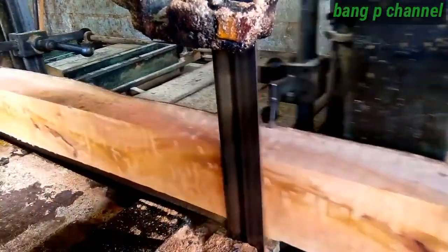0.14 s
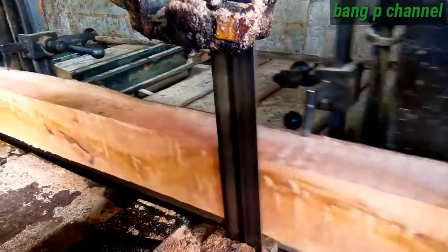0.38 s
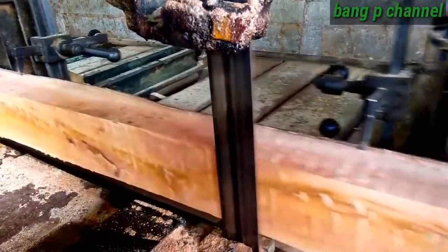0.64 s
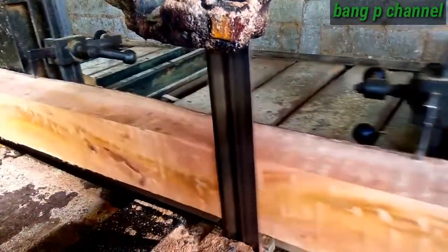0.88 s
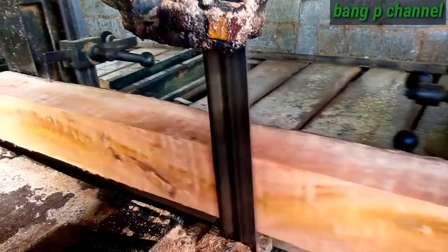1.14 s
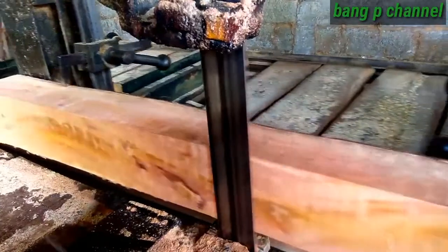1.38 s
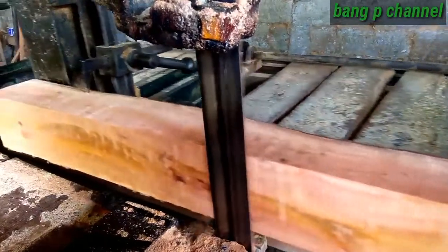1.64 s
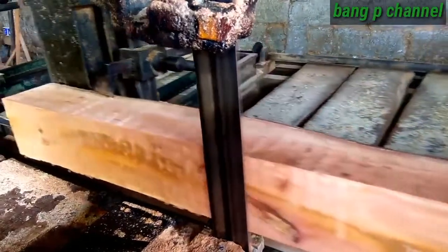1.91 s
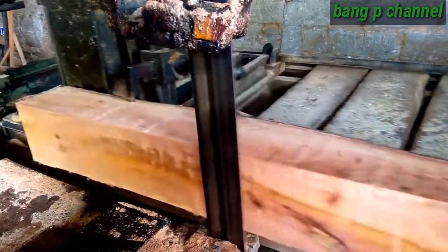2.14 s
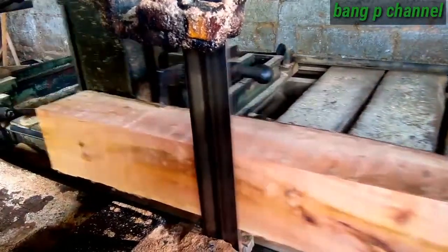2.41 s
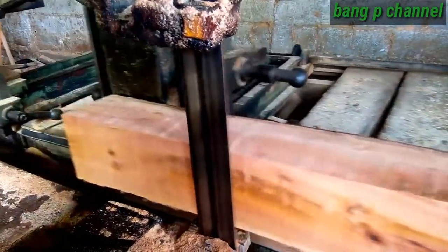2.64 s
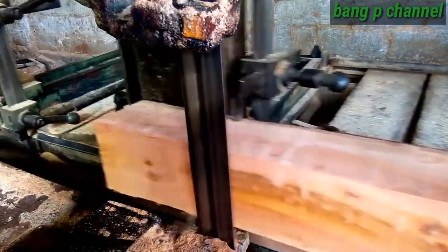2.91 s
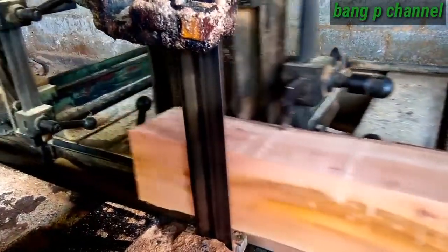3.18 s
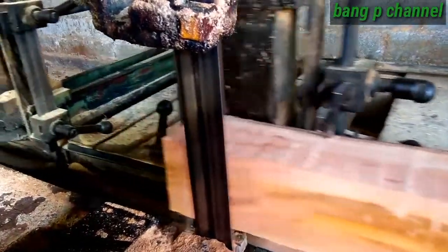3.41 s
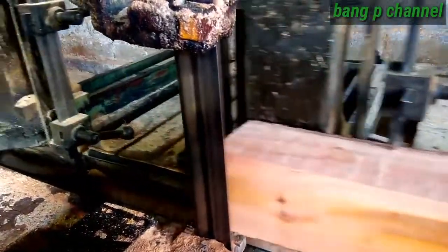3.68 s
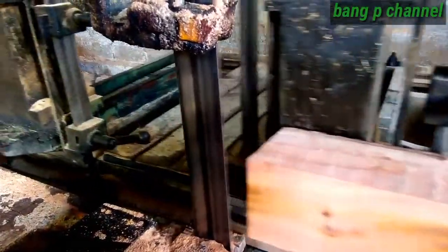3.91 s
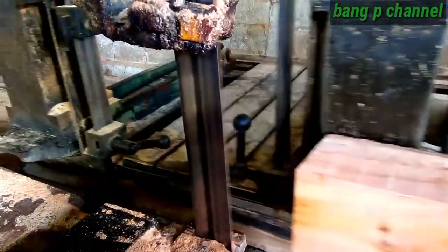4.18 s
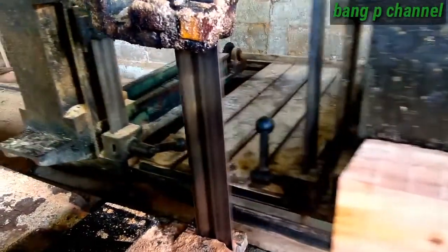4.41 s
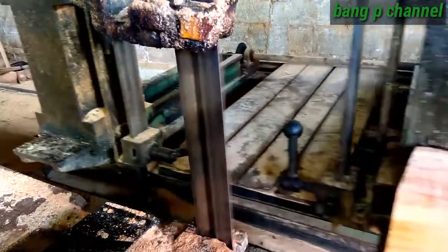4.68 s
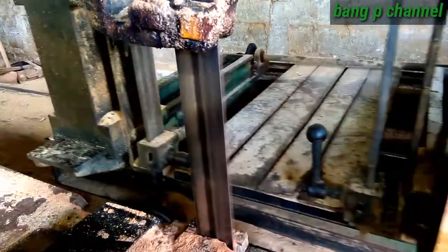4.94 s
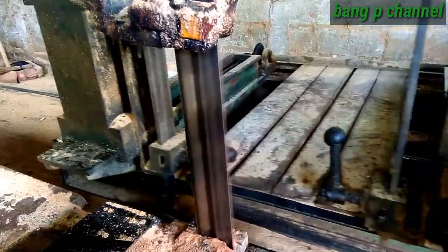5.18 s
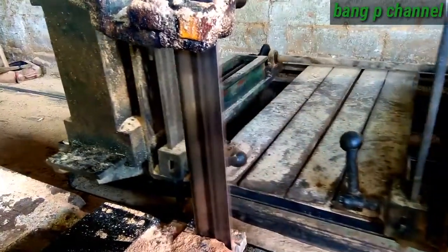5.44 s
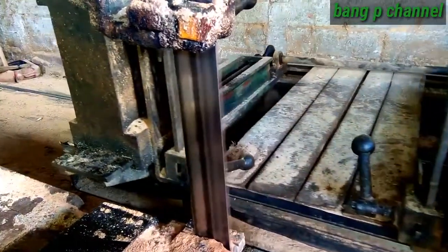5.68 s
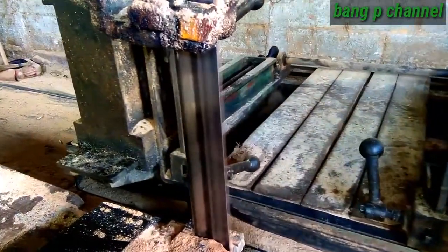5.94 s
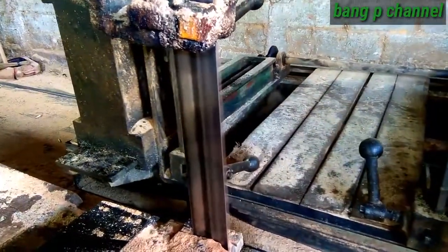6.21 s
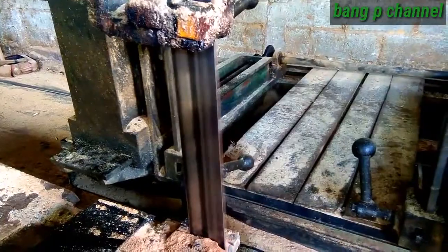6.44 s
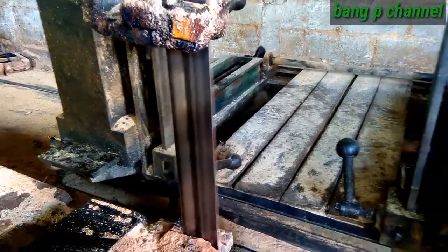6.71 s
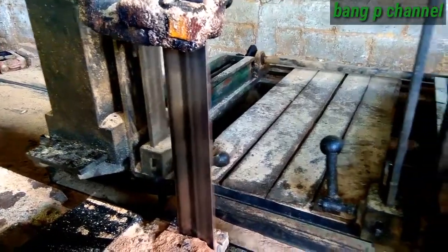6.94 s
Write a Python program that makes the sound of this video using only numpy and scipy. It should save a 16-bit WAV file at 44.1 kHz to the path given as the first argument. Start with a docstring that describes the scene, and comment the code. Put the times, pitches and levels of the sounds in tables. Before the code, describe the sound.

From 0 to about 7 seconds a wide band saw runs at full speed, very close to a small, overloaded microphone in a mill. The blade's scraping hiss is dense, harsh and constant, strongest around 4 to 5 kHz, with many narrow metallic resonances giving it a faint steely whine; it flutters slightly but never rises, slows or stops, even after the beam has passed. Far below it, a carriage rumbles softly and lumpily, with brief deeper shudders near 2.7 and 4.1 seconds and a longer one from 5.4 to 6. Small dull pops fall irregularly throughout, heavier ones near 0.3, 0.8, 1.3, 1.9, 2.8, 3.9, 4.2, 5.0, 5.9 and 6.95, partly buried. The level is held flat by limiting, and clipped peaks add constant gritty fizz above the hiss. The sound is dry, without noticeable echo, and ends still running.

```python
"""Wide band saw at full speed

A wide band saw runs in a mill, close to a small microphone. Its blade runs over wheels and through guides
with a steady scraping hiss: dense shaped noise, lifted at the resonances of the steel band and the frame.
Below, the carriage rumbles as low noise that shudders deeper three times; dull pops are pressure pulses.
The hiss is so loud that a limiter holds it down and the input still clips its peaks throughout."""
import sys
import numpy as np
from scipy import signal
from scipy.io import wavfile
from scipy.ndimage import uniform_filter1d

SR = 44100
rng = np.random.default_rng(int(sys.argv[2]) if len(sys.argv) > 2 else 0)


def dump_mix(stems):
    """Bounce the given channels to the path in sys.argv[1] as a 16-bit WAV at rate SR."""
    frames = np.atleast_2d(stems).T  # one column per channel
    limited = np.clip(frames, -1, 1)  # hard clip at full scale
    pcm = np.round(limited * 32767).astype(np.int16)
    wavfile.write(sys.argv[1], SR, pcm)


def invert_db(x):
    """Field ratio 10**(x/20) for x, a level in decibels (scalar or array-like)."""
    u = np.asarray(x, float) / 20
    return 10 ** u


N = 312228


def evened(x):
    """Scales to rms 1."""
    return x / np.sqrt(np.mean(x ** 2) + 1e-20)


def read(points, hz):
    """Interpolates a table along a log-frequency axis."""
    f, value = np.transpose(points)
    return np.interp(np.log(hz + 1), np.log(f + 1), value)


def drifting(noise, n_frames, n_bins):
    """Smooths (bin, frame) noise into patches of rms 1."""
    over_frames = uniform_filter1d(noise, size=n_frames, axis=1)
    return evened(uniform_filter1d(over_frames, size=n_bins, axis=0))


def hiss(colour_db, patchy_db, swell_db):
    """Noise of rms 1 from random short-time spectra, with narrow and wide drifting patches and a shared swell."""
    bins = len(colour_db)
    size = 2 * (bins - 1)
    frames = 4 * N // size + 5
    real, imag, narrow, wide = rng.standard_normal((4, bins, frames))
    patches = drifting(narrow, 6, 8) + 0.44 * drifting(wide, 4, 70)
    swell = evened(uniform_filter1d(rng.standard_normal(frames), size=5))
    level_db = colour_db[:, None] + patchy_db * patches + swell_db * swell
    spectra = (real + 1j * imag) * invert_db(level_db)
    noise = signal.istft(spectra, nperseg=size, noverlap=3 * size // 4)[1]
    return evened(noise[:N])


# broad colour of the blade's hiss at the microphone: (frequency [Hz], relative density [dB per Hz])
SCRAPE_COLOUR = [(400, -26), (740, -22.5), (800, -14), (1100, -17.5), (1250, -20.5), (1960, -14.5),
                 (2030, -9.5), (2490, -10.5), (2530, -13.5), (2990, -14), (3600, -11), (4050, -9.5),
                 (4450, -2), (5200, -3.5), (5550, -8), (5900, -15), (6500, -17), (7300, -28.5), (8500, -38),
                 (11000, -37)]
# resonances of band and frame: (frequency [Hz], width [Hz], lift over the hiss [dB])
STEEL_RINGS = [(801, 40, 4), (885, 35, 4), (1050, 60, 2), (1154, 20, 3), (1200, 20, 2), (1304, 35, 4),
               (1477, 22, 8), (1720, 40, 3), (1870, 30, 3), (2076, 30, 2.5), (2290, 40, 2), (2465, 50, 2.5),
               (2585, 30, 2.5), (2684, 70, 3.5), (2860, 90, 3.5), (3225, 50, 3), (3320, 70, 3),
               (3450, 90, 2), (3755, 30, 3), (3960, 50, 3.5), (4160, 60, 3), (4480, 60, 2), (4870, 25, 2.5),
               (5112, 45, 3), (5200, 50, 2), (5420, 80, 1.5), (5830, 60, 2), (6330, 150, 2), (6820, 150, 2)]
# patchy drift of the hiss: (frequency [Hz], depth [dB])
SCRAPE_DRIFT = [(800, 1), (2500, 1.6), (4500, 1.06), (7000, 1.1)]


def blade():
    """Scraping hiss on wheels and guides, lifted at each resonance of the steel and fluttering a little."""
    scrape_db, flutter_db, flutter_hz = -10, 0.46, 40
    hz = np.fft.rfftfreq(4096, 1 / SR)
    lift_db = sum(db / (1 + (2 * (hz - f) / width) ** 2) for f, width, db in STEEL_RINGS)
    lowpass = signal.butter(2, flutter_hz, fs=SR)
    flutter = evened(signal.lfilter(*lowpass, rng.standard_normal(N)))
    patchy_db = read(SCRAPE_DRIFT, hz)[:, None]
    scrape = hiss(read(SCRAPE_COLOUR, hz) + lift_db, patchy_db, swell_db=0.0)
    return invert_db(scrape_db + flutter_db * flutter) * scrape


# colour of the steady rumble: (frequency [Hz], relative density [dB per Hz])
RUMBLE_COLOUR = [(15, -39), (25, -24), (48, -51), (81, -1.5), (130, 2), (461, 1.5), (700, -2.5), (910, -34),
                 (1540, -120)]
# colour of the shudders: (frequency [Hz], relative density [dB per Hz])
SHUDDER_COLOUR = [(45, -30), (75, 1), (160, 4), (280, -7), (500, -40)]
# stretches of deeper shudder: (start [s], length [s], level [dB])
SHUDDER_TIMES = [(2.7, .15, -35), (4.05, 0.28, -45), (5.4, 0.57, -37)]


def carriage():
    """Lumpy low rumble of wheels on rails, with stretches of deeper noise faded in and out."""
    rolling_db, fade_s = -34, 0.027
    hz = np.fft.rfftfreq(2048, 1 / SR)
    t = np.arange(N) / SR
    rumble = hiss(read(RUMBLE_COLOUR, hz), patchy_db=0.45, swell_db=1.0)
    shudder = hiss(read(SHUDDER_COLOUR, hz), patchy_db=3.0, swell_db=-1.5)
    gain = np.zeros(N)
    for start, length, db in SHUDDER_TIMES:
        to_nearest_end = np.minimum(t - start, start + length - t)
        gain += invert_db(db) * np.clip(to_nearest_end / fade_s, 0, 1)
    return invert_db(rolling_db) * rumble + gain * shudder


# loudest dull pops: (time [s], signed height [relative pressure])
LOUD_POPS = [(0.308, -.14), (0.76, 0.17), (1.27, -.13), (1.889, 0.24), (2.786, -0.2), (3.873, 0.31),
             (4.167, 0.17), (4.639, 0.12), (5.007, 0.2), (5.861, 0.18), (6.349, 0.089), (6.95, 0.17)]


def knocks():
    """Each pop is one push of air and its rebound; small ones of either sign fall at random throughout."""
    pop_s, small_pops_per_s, smallest_db = 0.0011, 18, -30
    u = np.arange(600) / SR / pop_s
    push = u * (2 - u) * np.exp(-u) * 2
    height = invert_db(smallest_db + 4.1 * np.minimum(rng.exponential(1, N), 2.2))
    falls = rng.random(N) < small_pops_per_s / SR
    train = rng.choice([-1., 1.], N) * height * falls
    for s, loud_height in LOUD_POPS:
        train[round(s * SR)] += loud_height
    pops = signal.oaconvolve(train, push)[:N]
    # the small microphone drops the deepest part
    return signal.lfilter(*signal.butter(2, 85, "high", fs=SR), pops)


def scene():
    """Sums blade, carriage and pops at one microphone."""
    return (blade() + carriage() + knocks())[None]


def limited(x):
    """Fast limiter: takes off a share of the short-term level above its threshold."""
    threshold_db, recovery_db_per_s, share = -10.5, 240.0, 0.63
    power_db = 10 * np.log10(abs(uniform_filter1d(x[0] ** 2, size=80)) + 1e-12)
    fall_db = np.arange(N) * recovery_db_per_s / SR
    peak_db = np.maximum.accumulate(power_db + fall_db) - fall_db
    over_db = np.maximum(peak_db - threshold_db, 0)
    return x / invert_db(share * uniform_filter1d(over_db, size=40))


def clipped(x):
    """Input flattens what passes its ceiling, spraying gritty overtones above the hiss."""
    ceiling, knee, bias = 0.384, 14, 0.0022  # higher knee = sharper onset
    biased = x + bias
    return biased / (1 + abs(biased / ceiling) ** knee) ** (1 / knee)


# treble colour of the stage after the input: (frequency [Hz], gain [dB])
OUTPUT_COLOUR = [(8000, 0.26), (12300, -1.4), (15000, -0.2)]


def output_stage(x):
    """Steep low-pass band limit joined with a gentle treble colour."""
    edge_hz = 15490
    edge = signal.firwin(1023, edge_hz, window=("kaiser", 10), fs=SR)
    hz, db = np.transpose(OUTPUT_COLOUR)
    colour = signal.firwin2(129, [0, *hz, SR / 2], invert_db([db[0], *db, db[-1]]), fs=SR)
    return signal.oaconvolve(x, np.convolve(edge, colour)[None], "same")


def roll_off(x):
    """The treble ends steeply here."""
    return signal.sosfilt(signal.butter(12, 16460, fs=SR, output="sos"), x)


def record(dry):
    """Limiter, clipping input, then output stage."""
    held = limited(dry)
    mix = output_stage(clipped(held))
    return roll_off(mix)


dry = scene()
out = record(dry)
dump_mix(out)
```